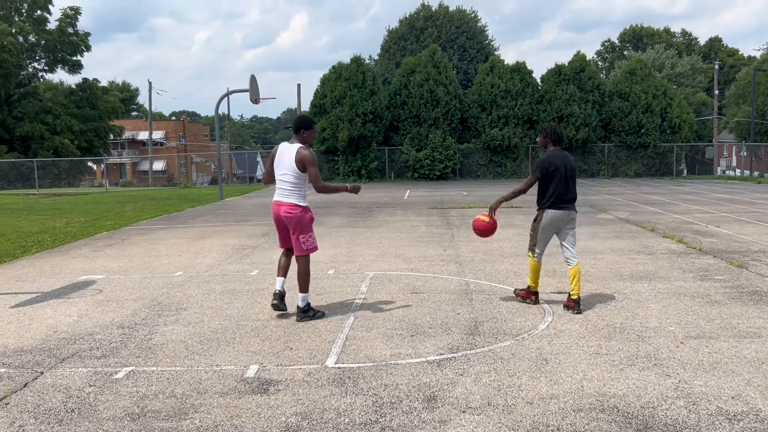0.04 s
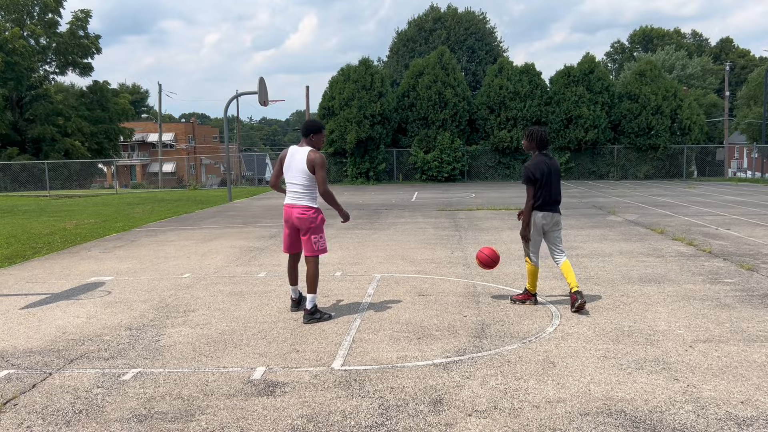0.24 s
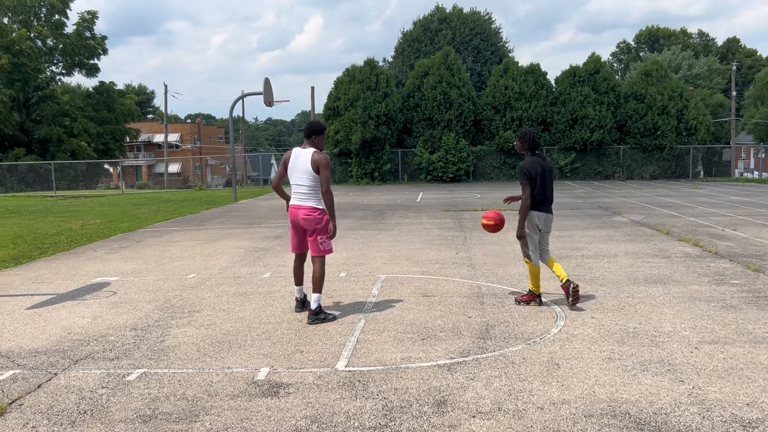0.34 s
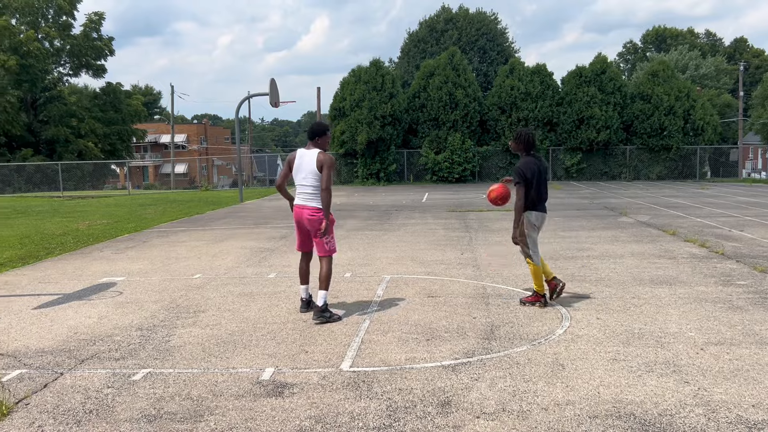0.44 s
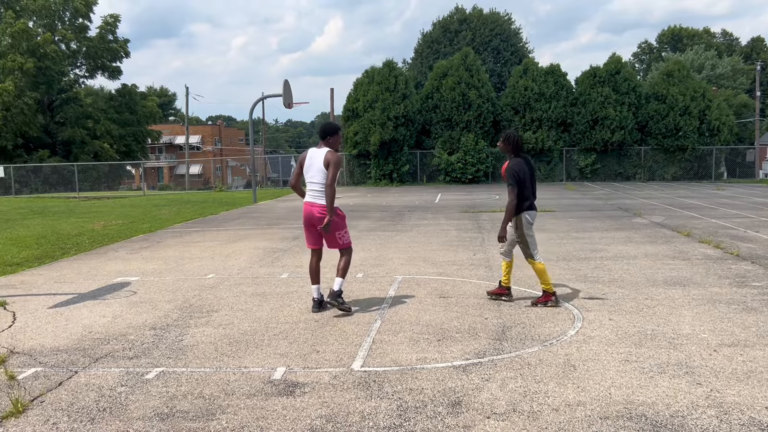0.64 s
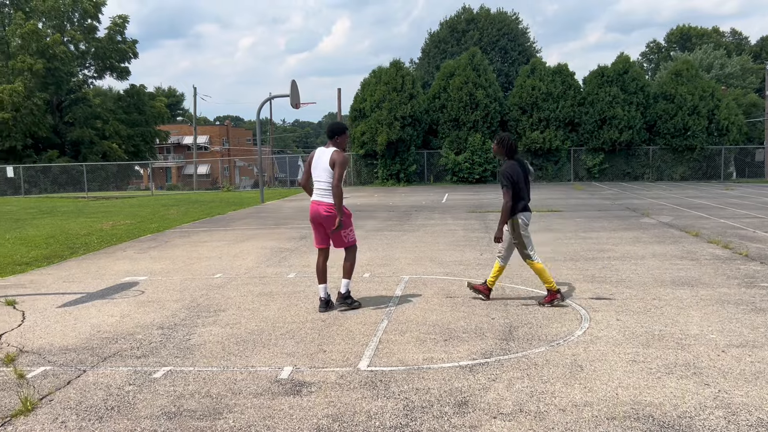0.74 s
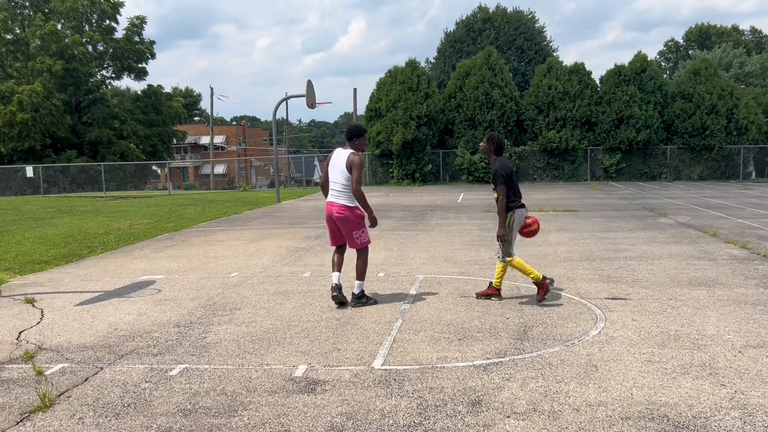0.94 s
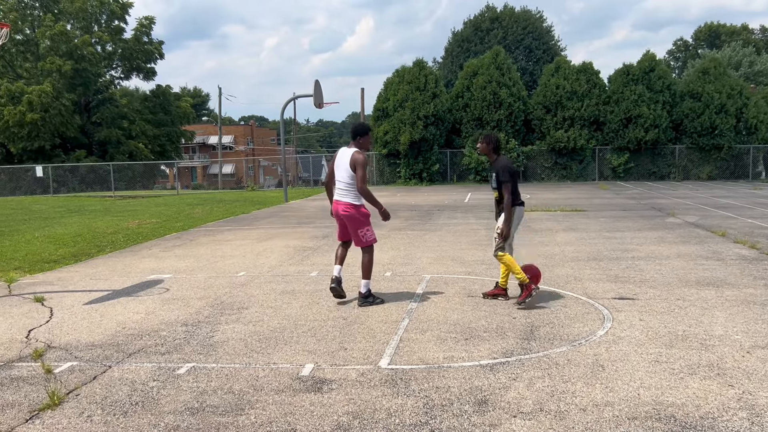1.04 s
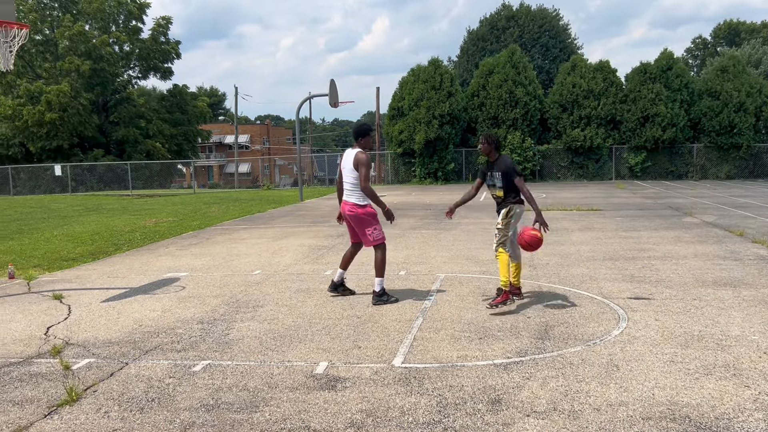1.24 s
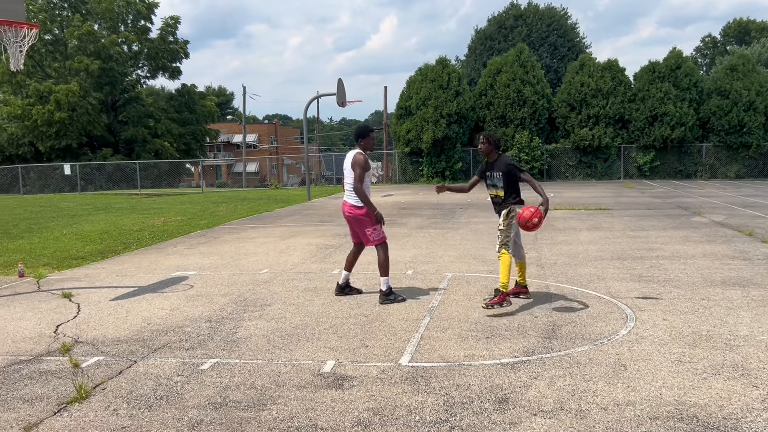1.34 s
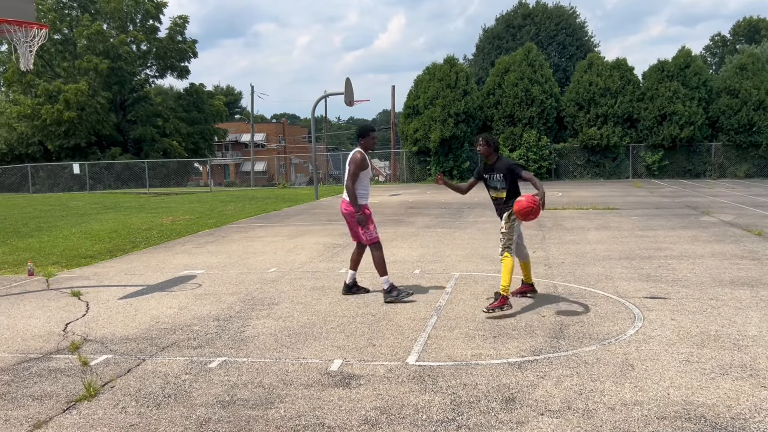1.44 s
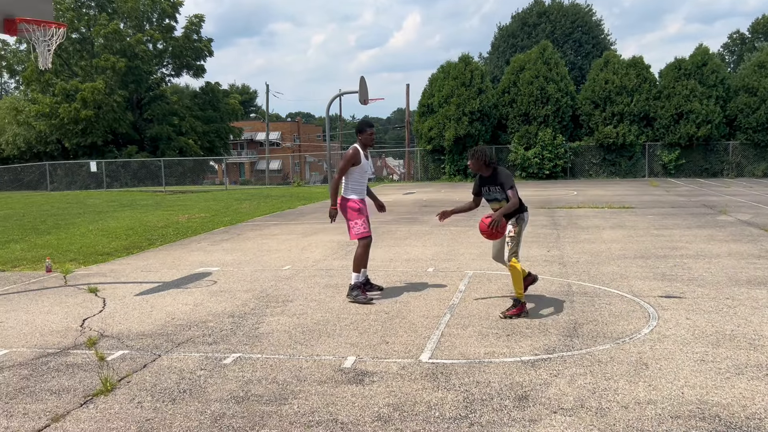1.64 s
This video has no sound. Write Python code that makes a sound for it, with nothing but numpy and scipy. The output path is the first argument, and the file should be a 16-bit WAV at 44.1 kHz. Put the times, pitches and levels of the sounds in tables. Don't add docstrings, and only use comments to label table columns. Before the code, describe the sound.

A basketball bounces on asphalt at 0.2 seconds with a hard bright slap, deep falling thump and short hollow ring, then again at 1.1 seconds, duller and softer. Diffuse outdoor echoes follow, with a barely audible steel ring after the first. Faint gritty scuffs and soft heel thuds occur throughout, with quick steps near 1.5 seconds. Low distant traffic and leafy hiss continue underneath, through a small camera microphone.

```python
import sys
import numpy as np
from scipy import signal
from scipy.fft import rfft, irfft, next_fast_len
from scipy.io import wavfile
from scipy.ndimage import map_coordinates

SR = 44100
rng = np.random.default_rng(int(sys.argv[2]) if len(sys.argv) > 2 else 0)


def materialize(psi):
    bounded = np.clip(np.atleast_2d(psi).T, -1, 1)
    quanta = np.round(bounded * 32767).astype(np.int16)
    wavfile.write(sys.argv[1], SR, quanta)


def decibels_to_gain(level_db):
    exponent = np.asarray(level_db, float) / 20
    return 10 ** exponent


N = 74970


def unit(x):
    return x / np.sqrt(np.mean(x ** 2) + 1e-20)


def along(points, hz):
    f, v = np.transpose(points)
    return np.interp(np.log(hz + 1), np.log(f + 1), v)


def over_time(points):
    return np.interp(np.arange(N) / SR, *np.transpose(points))


def filtered(x, response):
    m = next_fast_len(x.shape[-1] + 8192)
    return irfft(rfft(x, m) * response(np.fft.rfftfreq(m, 1 / SR)), m)[..., :x.shape[-1]]


def noise(spectrum, size):
    return unit(filtered(rng.standard_normal(size), lambda hz: decibels_to_gain(along(spectrum, hz))))


def wobble(rate):
    knots = rng.standard_normal(int(N * rate / SR) + 4)
    return map_coordinates(knots, [np.arange(N) * rate / SR])


def fade(t, t60):
    return (t >= 0) * decibels_to_gain(-60 * np.maximum(t, 0) / t60)


def tone(hz, t):
    return np.sin(2 * np.pi * hz * t)


THUMP_HZ, THUMP_START_HZ, SAG_S = 80, 270, .008
HOLD_S, THUMP_T60_S, THUMP_DB = .022, .047, -4.5


def thump(t, swell_s):
    turns = THUMP_HZ * t + (THUMP_START_HZ - THUMP_HZ) * SAG_S * (1 - np.exp(-t / SAG_S))
    swell = np.sin(np.pi / 2 * np.clip(t / swell_s, 0, 1)) ** 2
    decay = decibels_to_gain(-60 * np.maximum(t - HOLD_S, 0) / THUMP_T60_S)
    return -decibels_to_gain(THUMP_DB) * swell * decay * np.sin(2 * np.pi * turns)


SLAP_DB = [4.5, 6]
SLAP_TURNS = 5.73


def slap(t, k, slap_hz):
    return -decibels_to_gain(SLAP_DB[k]) * fade(t, SLAP_TURNS / slap_hz) * tone(slap_hz, t)


# pitch_hz, first_bounce_db, second_bounce_db, t60_s
CAVITY = [(61, -8, -6.5, 0.11), (257, -1, -0.5, 0.038), (341.3, -21.5, -6, 0.059),
          (418.3, -17.5, -16, 0.14), (578, -15.5, -11.5, 0.018), (802, -12.5, -16, 0.042),
          (957, -20.5, -14.5, 0.051), (1075, -10.5, -22.5, 0.039), (1267, -18, -20, 0.017),
          (1293, -25, -11, 0.024), (1520, -5.5, -23, 0.019), (1861, -23.5, -18, 0.066),
          (2120, -12, -17, 0.019), (2337, -15.5, -17, 0.023)]


def deep_air(t, k, swell_s):
    ring = sum(decibels_to_gain(level_db[k]) * fade(t, t60) * tone(hz, t)
               for hz, *level_db, t60 in CAVITY if hz < 500)
    return np.clip(t / swell_s, 0, 1) ** 2 * ring


PRESSED = [0.8, 1]
# pitch_hz, level_db
SKIN = [(300, -43), (1500, 25), (2800, -23.5), (4000, -5), (7000, 2.5), (10000, -16.5), (12000, -9),
        (15500, -1)]
# pitch_hz, level_db
RATTLE = [(250, 1.5), (700, -2.5), (1600, -19), (3000, -17.5), (8000, -40), (16000, -56)]
RATTLE_T60_S, RATTLE_DB = 0.051, -13


def strike(u, k, ring_share, crack_db):
    ring = 0
    for hz, *level_db, t60 in CAVITY:
        if hz > 500:
            phase = rng.random()
            ring = ring + decibels_to_gain(level_db[k]) * fade(u, t60 * ring_share) * np.sin(2 * np.pi * (hz * u + phase))
    crack = decibels_to_gain(crack_db) * fade(u, 0.0091) * noise(SKIN, size=len(u))
    rattle = decibels_to_gain(RATTLE_DB) * fade(u, RATTLE_T60_S) * noise(RATTLE, size=len(u))
    onset = np.clip(u / 0.00041, 0, 1)
    return onset * (ring + crack + rattle)


# start_s, level_db, slap_pitch_hz, peel_off_db, thump_swell_s
BOUNCES = [
    (0.222, -9, 3890, -4, 0.011),
    (1.1302, -11.5, 1960, -10, 0.0038),
]
BRIGHT_DB = [-2.5, -0.5]
CONTACT_S = .0122


def ball():
    out, t = np.zeros(N + SR), np.arange(SR // 2) / SR
    for k, (start_s, level_db, slap_hz, peel_db, swell_s) in enumerate(BOUNCES):
        body = thump(t, swell_s) + slap(t, k, slap_hz) + deep_air(t, k, swell_s)
        landing = strike(t, k, PRESSED[k], BRIGHT_DB[k])
        peel = decibels_to_gain(peel_db) * strike(t - CONTACT_S, k, 1, -24)
        out[round(start_s * SR):][:len(t)] += decibels_to_gain(level_db) * (body + landing + peel)
    return out[:N]


# pitch_hz, level_db
BALL_LEAN = [(100, -1.4), (400, -.6), (1000, -2.6), (2400, -.6), (5000, 3), (15000, .3)]
# pitch_hz, lead_rad
BALL_LEAD = [(300, 0), (1300, -.8), (2600, -.6), (5000, -1), (9000, -1.6), (15000, -1.4)]


def ports(bounce):
    def response(hz):
        level = decibels_to_gain(np.outer([.5, -.5], along(BALL_LEAN, hz)))
        return level * np.exp(1j * np.outer([.5, -.5], along(BALL_LEAD, hz)))
    return filtered(bounce, response)


# start_s, length_s, level_db, tilt_db_per_octave, hollow_depth_db
SCUFFS = [(0.133, 0.077, -47.5, -2.5, 6), (.345, 0.055, -61.5, -3, 2.5), (.567, 0.0056, -59.5, -5.5, -7),
          (.803, 0.0083, -56, 9, -3), (.828, 0.056, -53.5, -0.1, -1), (0.932, 0.34, -65.5, -6.5, 2.5),
          (1.18, 0.19, -67.5, 0.5, 7), (1.244, 0.064, -64, -7, -19), (1.456, 0.024, -62.5, 1, 4),
          (1.499, 0.18, -54.5, -7.5, 3.5), (1.542, 0.0081, -47, -8, -1.5), (1.599, .02, -49, -8.5, -3)]
# pitch_hz, level_db
GRIT = [(300, -8), (1000, 0.5), (2000, 3.5), (4000, -5), (7500, -5), (11000, -14.5), (15500, 1)]
# pitch_hz, share of the hollow depth
SOLE = [(600, 0.67), (1300, 1.05), (2100, -0.51), (3200, 1.2), (5300, -1.45), (7200, -0.027), (9000, -1)]
GRAINS_PER_S, GRAIN_SPREAD_DB = 2800, 3.5


def shoes():
    out = np.zeros((2, N + SR))
    for start_s, length_s, level_db, tilt_db, hollow_db in SCUFFS:
        u = np.arange(SR // 4) / SR / length_s

        def colour(hz):
            tilt = tilt_db * np.log2(hz / 2000 + 0.075)
            return decibels_to_gain(along(GRIT, hz) + hollow_db * along(SOLE, hz) + tilt)

        hits = rng.random(len(u)) < GRAINS_PER_S / SR
        sizes = decibels_to_gain(GRAIN_SPREAD_DB * np.minimum(rng.exponential(size=len(u)), 2))
        grains = rng.standard_normal((2, len(u))) * (1.14 + hits * sizes)
        grit = unit(filtered(grains[0] + 0.55 * grains * [[0], [1]], colour))
        stroke = np.sin(np.pi / 2 * np.clip(np.minimum(u / 0.27, (1 - u) / 0.45), 0, 1))
        sides = decibels_to_gain([[level_db - .8], [level_db + 0.27]])
        out[:, round(start_s * SR):][:, :len(u)] += sides * stroke * grit
    return out[:, :N]


# start_s, level_db, pitch_hz, t60_s
LOW_THUDS = [
    (0.315, -30.5, 129, 0.13),
    (1.217, -36, 160.6, 0.15),
    (1.543, -41.5, 235, 0.037),
    (1.6, -36.5, 277, 0.046),
]


def low_thuds():
    thuds = np.zeros(N)
    for start_s, level_db, hz, t60 in LOW_THUDS:
        u = np.arange(N) / SR - start_s
        thuds += decibels_to_gain(level_db) * fade(u, t60) * np.clip(u / 0.004, 0, 1) * tone(hz, u)
    return thuds * decibels_to_gain([[-.7], [.7]])


# pitch_hz, level_db, t60_s
POST = [(2896, -68.5, 1.8), (2903.4, -70, 1.8), (2200, -68, .6)]


def post():
    u = np.arange(N) / SR - BOUNCES[0][0] - .026
    return sum((-1) ** k * decibels_to_gain(level_db + 1.5 * wobble(30)) * fade(u, t60) * tone(hz, u)
               for k, (hz, level_db, t60) in enumerate(POST))


# pitch_hz, t60_s
TREES = [(100, 0.19), (1000, 0.77), (4000, 0.65), (12000, 0.25)]
# delay_s, level_db
HOUSES = [(.06, 6), (.095, 7), (.135, 6)]
ANSWER_DB, SPREAD_S = -23, .012
GAP = 700


def distance(x):
    hz, t, z = signal.stft(rng.standard_normal((2, SR // 2)), SR, nperseg=256)
    decay = decibels_to_gain(-60 * t / along(TREES, hz)[:, None])
    tail = signal.istft(z * decay, SR, nperseg=256)[1]
    lag = np.arange(tail.shape[1]) / SR + GAP / SR
    lift_db = sum(level_db * np.exp(-((lag - delay_s) / SPREAD_S) ** 2) for delay_s, level_db in HOUSES)
    tail = tail * decibels_to_gain(lift_db)
    tail = tail / np.linalg.norm(tail[0])
    wet = signal.fftconvolve(np.pad(x, (GAP, 0))[None], tail, axes=1)[:, :N]
    return decibels_to_gain(ANSWER_DB) * (0.23 * wet[0] + .5 * wet)


# pitch_hz, likeness 0..1
ALIKE = [(60, 1), (200, 0.88), (500, 0.45), (1000, 0.067), (4000, 0.43), (15000, 0.067)]
# pitch_hz, level_db
LEAN = [(60, -2), (180, -2.5), (550, 1.5), (1650, 0.5), (4970, 5), (15000, -5)]


def rush(spectrum):
    def mid_side(hz):
        turn = np.arccos(np.clip(along(ALIKE, hz), -1, 1)) / 2
        return decibels_to_gain(along(spectrum, hz)) * [np.cos(turn), np.sin(turn)]
    mid, side = filtered(rng.standard_normal((2, N)), mid_side)
    sides = np.array([mid + side, mid - side])
    return unit(filtered(sides, lambda hz: decibels_to_gain(np.outer([.5, -.5], along(LEAN, hz)))))


# start_s, level_db
TRAFFIC = [(0.0, -52.5), (0.104, -48.5), (0.278, -47.5), (0.942, -48.5), (1.264, -47.5), (1.7, -46)]
# pitch_hz, level_db
RUMBLE = [(13, -45), (22, -29), (46, -8.5), (75, -4), (134, -15.5), (247, -19), (264, -22.5), (351, -27),
          (500, -32.5), (650, -47), (1100, -120)]
# start_s, level_db
BREEZE = [(0, -61.5), (.4, -59.5), (.75, -61.5), (1.1, -59), (1.35, -59.5), (1.7, -56.5)]
# pitch_hz, level_db
AIR = [(300, -27), (450, -2), (1000, -6), (2200, -14.5), (3500, -20), (5500, -23), (11500, -39.5),
       (14500, -56)]


def town():
    rumble = decibels_to_gain(over_time(TRAFFIC) + 2.0 + 1.07 * wobble(9.8)) * rush(RUMBLE)
    hiss = decibels_to_gain(over_time(BREEZE) + 0.17 * wobble(3.4)) * rush(AIR)
    return rumble + hiss


def scene():
    bounce = ball()
    return ports(bounce) + distance(bounce) + post() + low_thuds() + shoes() + town()


def top_cut(x):
    return signal.sosfilt(signal.butter(12, 17000, fs=SR, output="sos"), x)


# pitch_hz, level_db
MIC = [(8500, 1.5), (9200, -13.5), (10100, -10), (10600, -2), (12600, -2.5), (13600, -26), (15200, -5.5),
       (16800, -33)]


def record(dry):
    def response(hz):
        bass_cut = hz ** 4 / (hz ** 4 + 32 ** 4)
        return decibels_to_gain(along(MIC, hz)) * bass_cut
    mix = filtered(dry, response)
    return top_cut(mix)


dry = scene()
out = record(dry)
materialize(out)
```